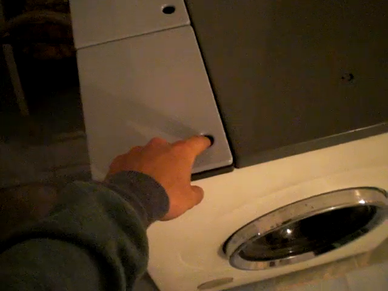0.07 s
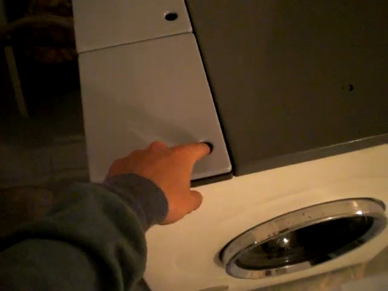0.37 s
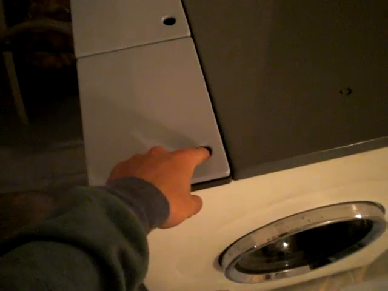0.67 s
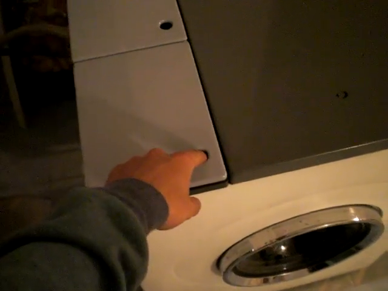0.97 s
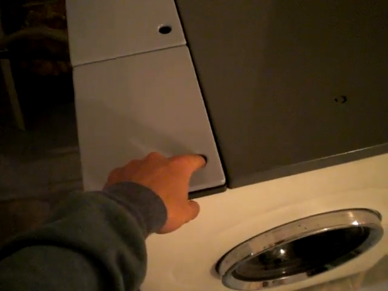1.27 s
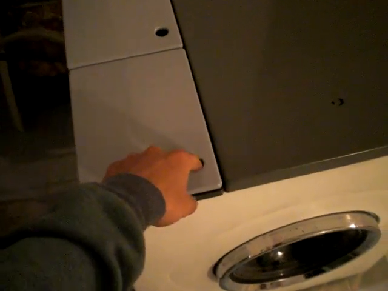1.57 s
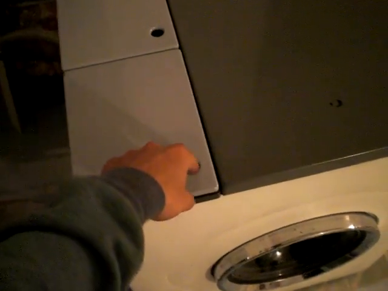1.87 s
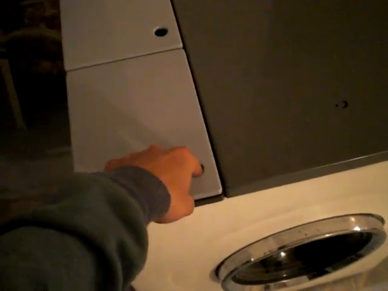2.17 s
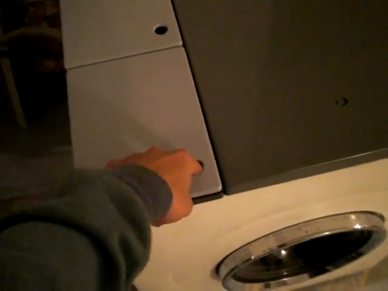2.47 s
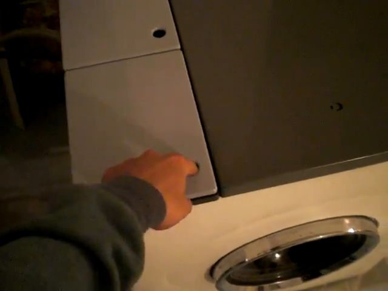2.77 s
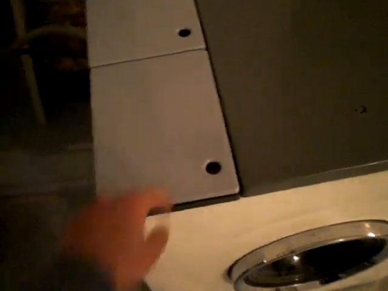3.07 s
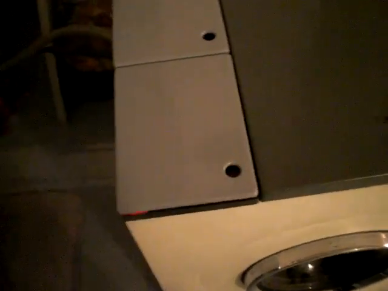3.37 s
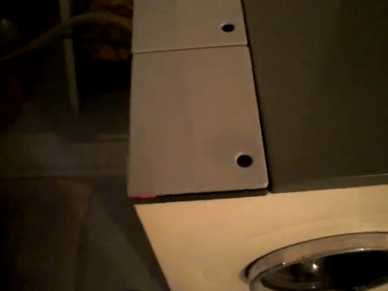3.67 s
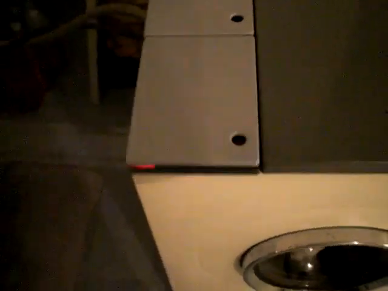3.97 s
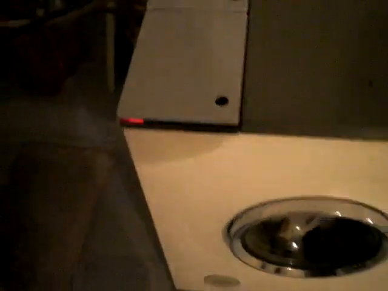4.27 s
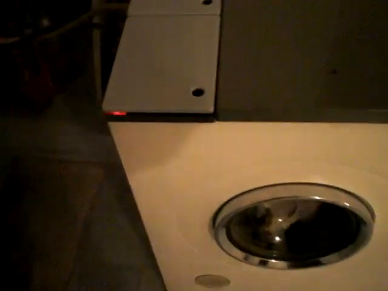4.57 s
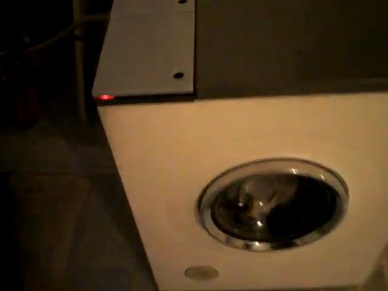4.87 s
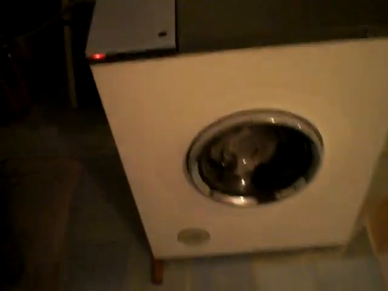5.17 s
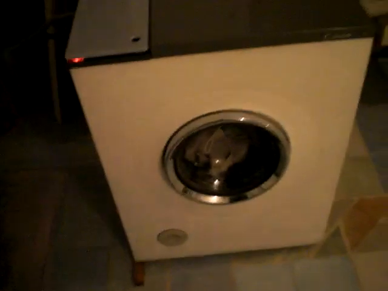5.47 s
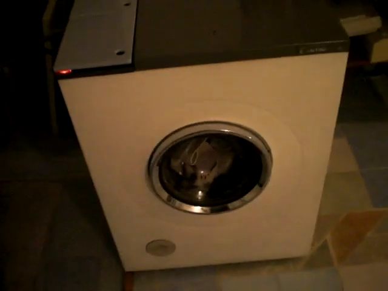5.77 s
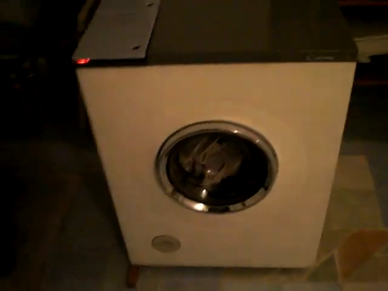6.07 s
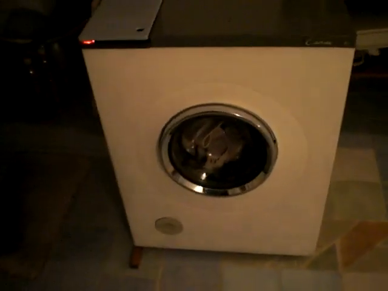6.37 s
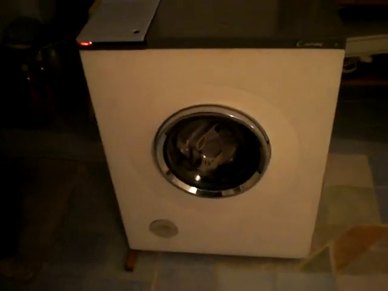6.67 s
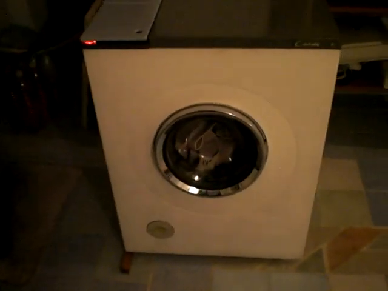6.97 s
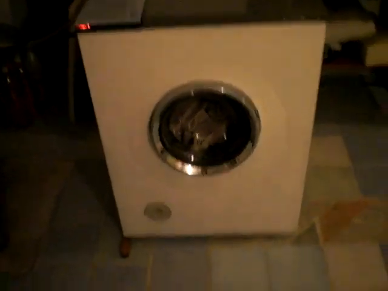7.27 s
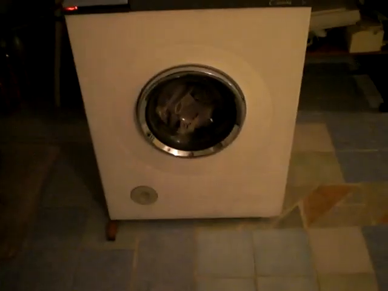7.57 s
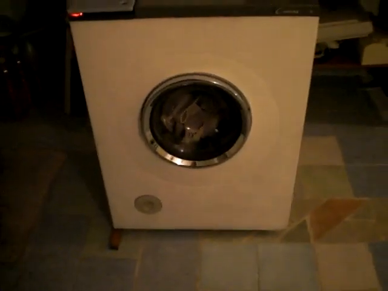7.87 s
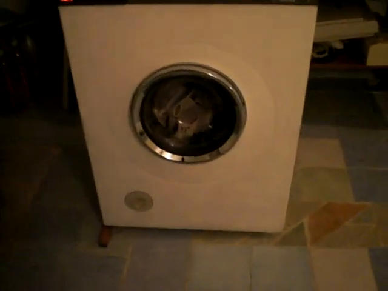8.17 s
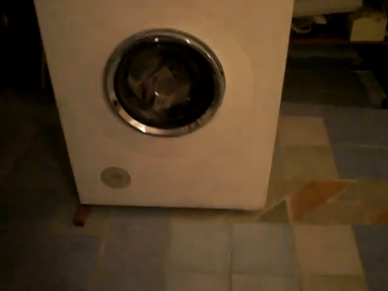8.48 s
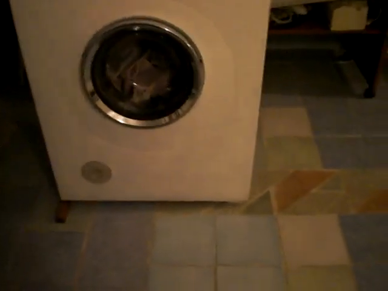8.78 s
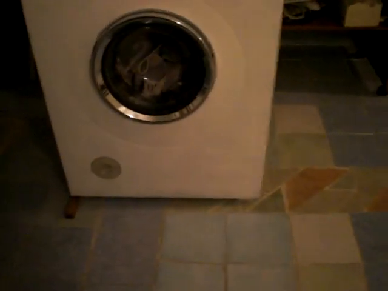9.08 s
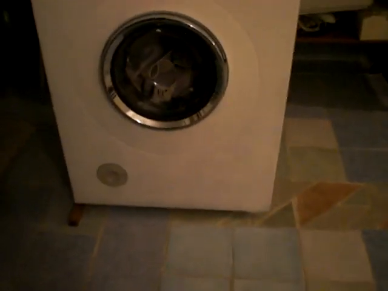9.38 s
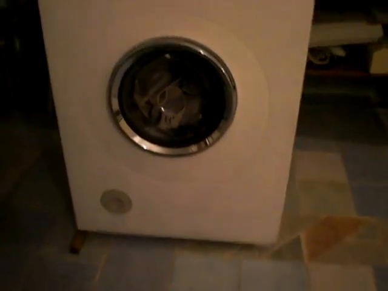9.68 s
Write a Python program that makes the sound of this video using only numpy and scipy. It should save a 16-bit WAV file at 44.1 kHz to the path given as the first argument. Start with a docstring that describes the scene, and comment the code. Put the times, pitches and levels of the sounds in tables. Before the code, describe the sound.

In a quiet tiled room, an old washing machine's button snaps in loudly and springs back, briefly ringing the steel cabinet. The motor starts a much quieter low hum, and the gears chatter in a fast, lopsided rhythm, rasping and scratching as they take up the load. The microphone backs away with a few soft scuffs, so the machine grows a little quieter and more echoey over a faint hiss.

```python
"""In a tiled room, an old washing machine's button snaps in and springs back, ringing the steel cabinet.
The motor starts to hum, and the gears catch in the same lopsided pattern ten times a second,
ringing their housing while their teeth rasp and scratch. The listener steps back with a few soft
scuffs, so the machine grows quieter and more echoey. A faint hiss lies under it all."""
import sys
import numpy as np
from scipy import signal
from scipy.fft import rfft, irfft
from scipy.io import wavfile

SR = 44100
rng = np.random.default_rng(int(sys.argv[2]) if len(sys.argv) > 2 else 0)


def bounce(signal):
    """Save signal as a 16-bit WAV file at the path given by the first command-line argument."""
    frames = np.transpose(np.atleast_2d(signal))
    limited = np.clip(frames, -1, 1)
    pcm = np.round(limited * 32767).astype(np.int16)
    wavfile.write(sys.argv[1], SR, pcm)


N = 429093
T = np.arange(N) / SR
TURN_HZ, TURN_START_S = 9.978, 2.238  # the shaft that drives both the gear chatter and the hum

# each knock of the button: start_s, level_db, treble_tilt_db_per_octave, cabinet_ring_db
BUTTON_KNOCKS = [(2.219, -15.5, -3.5, 4), (2.2282, -4.5, -1, -14), (2.2386, 0, 1.5, 8), (2.2420, 1, -1, 9),
                 (2.5771, -4, 1.5, 4)]
# the notes the steel cabinet rings at: pitch_hz, level_db, fade_s (time to fall by 60 dB)
CABINET_NOTES = [(210, -19, .8), (427, -17, .6), (735, 3, .08), (770, -3, .3), (871, -12, .4),
                 (1340, -6, .42), (1448, -6, .42), (1500, -4, .4), (1687, -2, .4), (2272, -5, .22),
                 (2356, -4, .22), (2482, -4, .27), (2536, -8, .3), (2774, -5, .25), (2893, -6, .27),
                 (2977, -6, .45), (3081, -6, .35), (3725, 1, .22), (6137, -13, .35), (6293, -12, .3),
                 (7063, -14, .35)]
# tone of the button snapping in: pitch_hz, gain_db
PRESS_TONE = [(40, -20), (120, -17), (200, -3), (620, -5.5), (760, 0.5), (1150, -4.5), (1550, 7.5),
              (1880, -4), (2700, 4), (4300, -5), (6800, -2), (9500, -3), (13000, -7), (15500, 2)]
# tone of the button springing back: pitch_hz, gain_db
RELEASE_TONE = [(40, -13), (200, -2), (400, 3), (800, -2), (1300, 2.5), (1800, -1), (2450, 10), (3100, 1),
                (3700, 1), (4800, -4.5), (6400, 1), (8800, -10.5), (11000, -1), (15500, -13)]

def button(snap_db=6, crack_fade_s=0.08, cabinet_db=-44, release_after_s=2.5):
    """Each knock cracks the plastic and latch, echoes off the tiles and sets the cabinet ringing."""
    out, t = np.zeros(N), T[:SR]
    pitch_hz, note_db, fade_s = np.transpose(CABINET_NOTES)[:, :, None]
    for start_s, level_db, tilt_db, ring_db in BUTTON_KNOCKS:
        crack = rng.standard_normal(SR) * fade(t, crack_fade_s)
        crack = crack / np.linalg.norm(crack) + room_echo(low_s=0.84, mid_s=0.45, high_s=0.19)
        tone = PRESS_TONE if start_s < release_after_s else RELEASE_TONE
        snap = undb(snap_db) * shape_tone(crack, tone, tilt_db)
        # a brighter knock favours the higher notes
        strength = undb(note_db + 2 * tilt_db * np.log2(pitch_hz / 2000))
        notes = np.sin(2 * np.pi * (pitch_hz * t + rng.random(pitch_hz.shape)))
        ring = np.sum(strength * fade(t, fade_s) * notes, axis=0)
        start = int(start_s * SR)
        out[start:start + SR] += undb(level_db) * (snap + undb(cabinet_db + ring_db) * ring)
    return out


# where the gears catch in every turn: time_in_turn_s, spread_s, ring_db, rasp_db, scratch_db
GEAR_CATCHES = [(.0072, .0010, 2.5, -4.5, -9), (0.013, 0.0026, -7, -4.5, -3),
                (0.0184, 0.0026, -1.5, -3, -2), (0.0272, 0.0033, -11, -3, -4.5),
                (0.0378, 0.0026, -5.5, -9, -3.5), (0.047, 0.0036, 0, -6.5, -17),
                (.0535, .003, -6, -8.5, -13), (.0700, 0.0036, -16, -16, -18),
                (0.081, 0.0038, -17, -14, -19)]

def gear_forces(slip_s=0.00054, idle_db=-21):
    """The pushes behind ring, rasp and scratch: the same catches each turn, never quite alike."""
    turn, phase = np.divmod((T - TURN_START_S) * TURN_HZ, 1)
    turn = (turn - turn[0]).astype(int)
    turn_db = rng.standard_normal(turn[-1] + 1)
    energy = np.full((3, N), undb(idle_db) ** 2)
    for time_in_turn_s, spread_s, *shares_db in GEAR_CATCHES:
        catch_db, slip = rng.standard_normal((turn[-1] + 1, 2)).T
        pulse = bump(phase / TURN_HZ, time_in_turn_s + slip_s * slip[turn], spread_s)
        push = undb(turn_db + catch_db)[turn] ** 2 * pulse
        energy += push * undb(shares_db)[:, None] ** 2
    return np.sqrt(energy)


# the notes the gear housing rings at: pitch_hz, width_hz, gain_db
HOUSING_NOTES = [(768, 27, 5.5), (1160, 80, -1.5), (1300, 88, 11.5), (1370, 57, -6)]
# moments when the gears scrape hardest: time_s, extra_db
HARD_SCRAPES = [(3.56, 3.5), (3.76, 3), (4.46, 5), (5.96, 2.5), (6.47, 5), (6.87, 4), (7.47, 4), (8.37, 3),
                (8.57, 1.5)]
# tone of the teeth rubbing: pitch_hz, gain_db
RASP_TONE = [(150, -14), (400, -5), (650, -7.5), (950, -3), (1150, 2.5), (1550, -2.5), (1750, 0),
             (2100, -0.5), (2400, 2), (2700, -3.5), (3100, -9.5), (3600, -13), (6500, -24), (15500, -32)]
# tone of the teeth biting: pitch_hz, gain_db
SCRATCH_TONE = [(1200, -16), (2600, 6), (3500, 7), (4600, 0.5), (7500, -20), (10000, -5), (15500, -25)]

def gears(echo, grain_db=3):
    """Each catch rings the housing, while the teeth rasp in fine grains and scratch as they bite."""
    knock, rub, bite = gear_forces()
    hard_db = sum(extra_db * bump(T, time_s, 0.015) for time_s, extra_db in HARD_SCRAPES)
    blur_db = 6 * distance()  # from further off, echoes fill the gaps between catches
    force = knock * turn_noise(memory=0.55)
    ring = sum(undb(gain_db) * band(force, pitch_hz - width_hz / 2, pitch_hz + width_hz / 2, order=1)
               for pitch_hz, width_hz, gain_db in HOUSING_NOTES)
    ring = band(ring, 826, 1570, order=2)
    ring = set_level(in_room(ring, echo, echo_db=blur_db - 8.5))
    grains = rub * turn_noise(memory=0.48) * undb(hard_db / 2 + grain_db * rng.standard_normal(N))
    rasp = in_room(shape_tone(grains, RASP_TONE), echo, echo_db=blur_db - 8.5)
    rasp = rasp / np.std(band(rasp, 1700, 3500))
    grit = bite * rng.standard_normal(N) * undb(hard_db + grain_db * rng.standard_normal(N))
    scratch = in_room(shape_tone(grit, SCRATCH_TONE), echo, echo_db=blur_db - 6)
    teeth = rasp * undb(-1) + set_level(scratch, -8)
    ring_db, teeth_db = gear_levels()
    return ring * undb(ring_db) + teeth * undb(teeth_db)


def gear_levels(load_start_s=2.83, load_rise_s=0.92):
    """The gears swell as they take up the load, then grow quieter as the listener steps back."""
    slack = (1 - ramp(load_start_s, load_rise_s)) ** 1.75
    dip_db = -9 * bump(T, centre_s=6.18, spread_s=0.24)  # the ring fades for a moment
    ring_db = -49 - 8.5 * slack - 9 * distance() + dip_db
    teeth_db = -54 - 8 * slack - 2 * distance()
    return ring_db, teeth_db


# the notes in the motor's hum: cycles_per_turn, near_db, far_db
HUM_NOTES = [(9, -73, -76.5), (11, -76, -72), (22, -66.5, -80), (23, -67, -83), (25, -70, -76),
             (33, -72.5, -68), (49, -89, -71.5), (50, -88, -72.5)]
# tone of the droning cabinet panels: pitch_hz, gain_db
DRONE_TONE = [(50, -23), (100, -19), (150, -17), (190, -5.5), (215, 0), (250, -0.5), (285, -7.5),
              (400, -12), (500, -8), (650, -13.5), (770, -11.5), (900, -10), (2000, -32.5)]

def motor(drone_db=-63, waver_db=2.2, wobble_rad=0.66):
    """The shaft hums over the drone of the panels; the mix of notes shifts across the room."""
    hum = 0
    for cycles_per_turn, near_db, far_db in HUM_NOTES:
        phase = 2 * np.pi * (cycles_per_turn * TURN_HZ * T + rng.random())
        phase += wobble_rad * wander(rate_hz=7)
        level_db = near_db + distance() * (far_db - near_db) + waver_db * wander(rate_hz=4)
        hum = hum + np.sqrt(2) * undb(level_db) * np.sin(phase)
    drone = shape_tone(turn_noise(memory=0.57), DRONE_TONE)
    drone = drone / np.std(band(drone, 190, 290))
    return hum + drone * undb(drone_db - 2 * distance())


# the listener's small movements: peak_s, rise_s, fall_s, level_db, pitch_hz
SCUFF_MOVES = [(2.12, 0.055, 0.035, -65, 300), (2.183, 0.015, 0.025, -50, 248),
               (2.417, 0.0067, 0.015, -39.5, 1900), (2.48, 0.014, .03, -48, 2350),
               (3.72, 0.035, .04, -62, 5000), (3.97, .04, .04, -60.5, 5000),
               (4.797, 0.005, 0.012, -44.5, 450), (4.826, 0.012, 0.022, -56, 9000),
               (4.829, 0.025, 0.045, -46.5, 3530), (5.135, 0.022, .02, -60, 6000),
               (7.77, 0.023, 0.044, -53, 5400), (7.77, .02, .03, -61, 11000), (9.13, 0.062, .05, -60, 4970)]

def scuffs(echo, width_ratio=1.27, grit_db=5):
    """Shoes, sleeve and hand rub in short, gritty swells."""
    out, t = np.zeros(N + SR), T[:SR] - .5
    for peak_s, rise_s, fall_s, level_db, pitch_hz in SCUFF_MOVES:
        noise = rng.standard_normal(SR)
        grains = np.repeat(rng.standard_normal(SR), 30)[:SR]
        grit = noise * undb(grit_db * grains)
        rub = band(grit, pitch_hz / width_ratio, pitch_hz * width_ratio, order=1)
        swell = np.exp(-(np.minimum(t, 0) / rise_s) ** 2 / 2 - np.maximum(t, 0) / fall_s)
        start = int((peak_s - .5) * SR)
        out[start:start + SR] += swell * set_level(rub, level_db)
    return in_room(out[:N], echo, echo_db=-3.5)


# tone of the quiet room and microphone hiss: pitch_hz, gain_db
HISS_TONE = [(25, 2.5), (60, 0.5), (120, 0.5), (250, -0.5), (600, -4), (1500, -7.5), (4000, -11.5),
             (8000, -15), (15500, -17.5)]

def background(hiss_db=-57, whine_hz=7973, whine_db=-84):
    """An even hiss with a thin electronic whine."""
    hiss = set_level(shape_tone(rng.standard_normal(N), HISS_TONE), hiss_db)
    return hiss + set_level(np.sin(2 * np.pi * whine_hz * T), whine_db)


def room_echo(low_s, mid_s, high_s):
    """Sound bouncing off the tiles, with fade times for low, middle and high pitches."""
    noise, hz = rfft(rng.standard_normal(SR)), np.arange(SR // 2 + 1)
    centres_hz = [200, 700, 2400, 6000, 10000, 15000]
    fades_s = np.interp(centres_hz, [200, 2400, 15000], [low_s, mid_s, high_s])
    # overlapping bands, so the fade time glides with pitch
    echo = sum(irfft(noise * np.interp(hz, centres_hz, peak), SR) * fade(T[:SR], fade_s)
               for peak, fade_s in zip(np.eye(len(centres_hz)), fades_s))
    return echo / np.linalg.norm(echo)


def in_room(x, echo, echo_db):
    """Add the room's echo, keeping about the same total power."""
    gain = undb(echo_db)
    return (x + gain * signal.fftconvolve(x, echo)[:N]) / np.sqrt(1 + gain ** 2)


def distance():
    """How far the listener has stepped back, from 0 to 1."""
    return ramp(start_s=4.03, length_s=2.77)


def turn_noise(memory):
    """Surface roughness that comes round again each turn and slowly changes."""
    size = round(SR / TURN_HZ)
    turns = rng.standard_normal((N // size + 1, size))
    return set_level(signal.lfilter([1], [1, -memory], turns, axis=0).ravel()[:N])


def wander(rate_hz):
    """A slow random drift, mostly between -1 and 1."""
    points = rng.standard_normal(int(T[-1] * rate_hz) + 2)
    return np.interp(T * rate_hz, np.arange(len(points)), points)


def shape_tone(x, tone, tilt_db=0):
    """Turn pitches up or down to follow a tone table, tilted per octave around 2 kHz."""
    pitch_hz, gain_db = np.transpose(tone)
    grid_hz = np.maximum(np.fft.rfftfreq(8192, 1 / SR), 1)
    curve_db = np.interp(np.log(grid_hz), np.log(pitch_hz), gain_db) + tilt_db * np.log2(grid_hz / 2000)
    # build the filter so that it never rings before the sound arrives
    cepstrum = irfft(np.log(undb(curve_db)))
    half = len(cepstrum) // 2
    cepstrum[1:half] *= 2
    cepstrum[half + 1:] = 0
    response = irfft(np.exp(rfft(cepstrum)))[:half]
    return signal.fftconvolve(x, response)[:len(x)]


def band(x, low_hz, high_hz, order=3):
    """Keep the pitches between two limits."""
    return signal.sosfilt(signal.butter(order, [low_hz, high_hz], "band", fs=SR, output="sos"), x)


def fade(t, fade_s):
    """Die away by 60 dB in fade_s."""
    return np.exp(-np.log(1000) * t / fade_s)


def ramp(start_s, length_s):
    """Rise evenly from 0 to 1."""
    return np.clip((T - start_s) / length_s, 0, 1)


def bump(t, centre_s, spread_s):
    """A smooth hill of height 1."""
    return np.exp(-.5 * ((t - centre_s) / spread_s) ** 2)


def set_level(x, db=0):
    """Scale to an average (rms) level."""
    return x * undb(db) / np.sqrt(np.mean(x ** 2))


def undb(db):
    """Turn decibels into a multiplier."""
    return 10 ** (np.asarray(db) / 20)


def scene():
    """Button, running machine and footwork in one small room."""
    echo = room_echo(low_s=0.77, mid_s=0.37, high_s=0.2)
    power = ramp(start_s=2.22, length_s=.1)
    machine = power * (gears(echo) + motor())
    return (button() + machine + scuffs(echo) + background())[None]


def record(dry, on_s=.136, start_db=-12, wake_s=0.25, pop_db=-47, settle_s=0.16, top_hz=15850):
    """The sound switches on with a soft low pop and fades up; the highest treble is cut."""
    on, since_s = T > on_s, np.maximum(T - on_s, 0)
    wake = 1 - (1 - undb(start_db)) * np.exp(-since_s / wake_s)
    pop = undb(pop_db) * np.exp(-since_s / settle_s)
    treble_cut = signal.ellip(10, .2, 70, top_hz, fs=SR, output="sos")
    return signal.sosfilt(treble_cut, on * (dry * wake - pop))


dry = scene()
out = record(dry)
bounce(out)
```